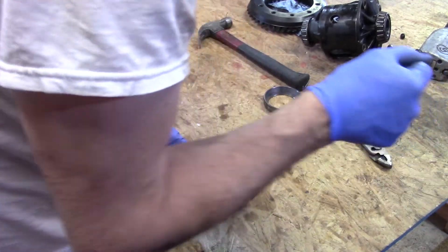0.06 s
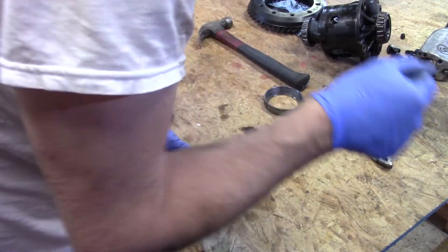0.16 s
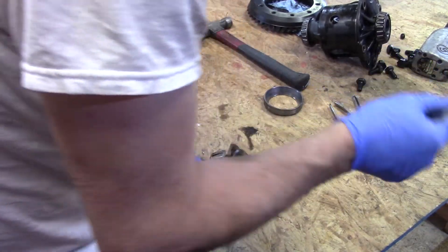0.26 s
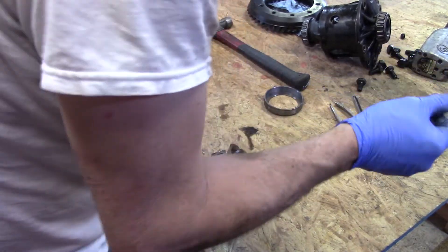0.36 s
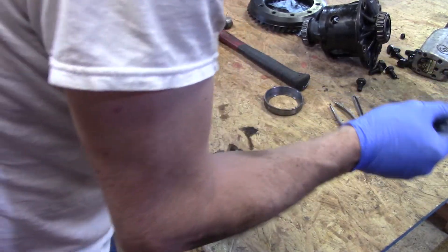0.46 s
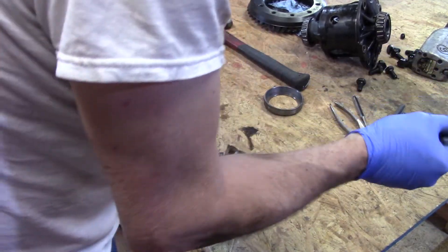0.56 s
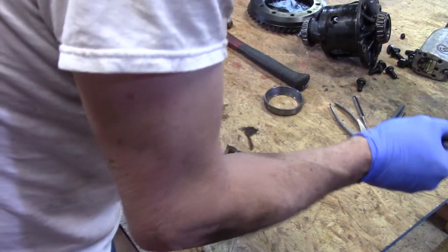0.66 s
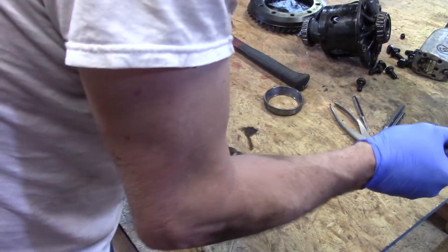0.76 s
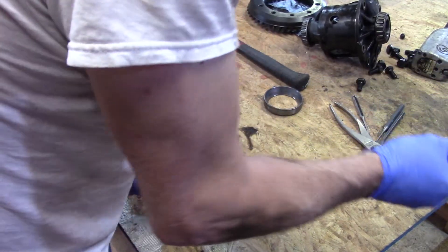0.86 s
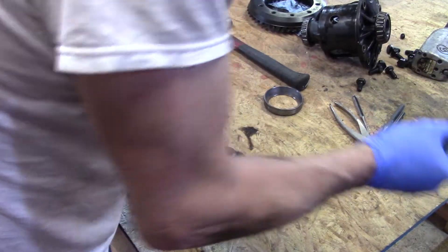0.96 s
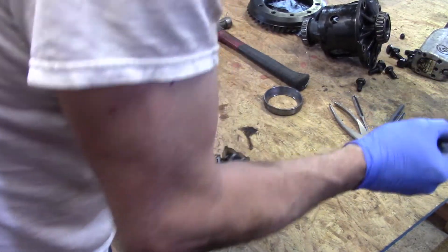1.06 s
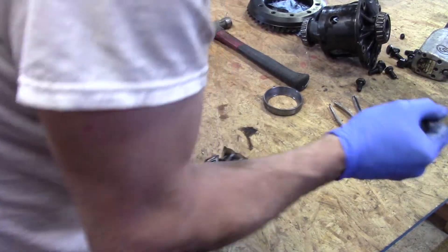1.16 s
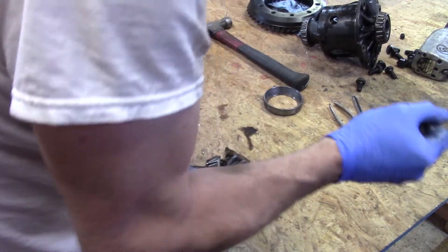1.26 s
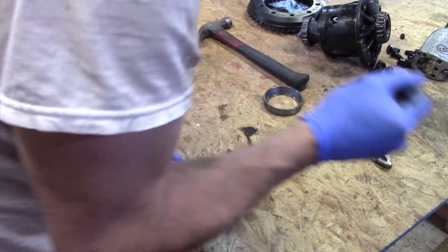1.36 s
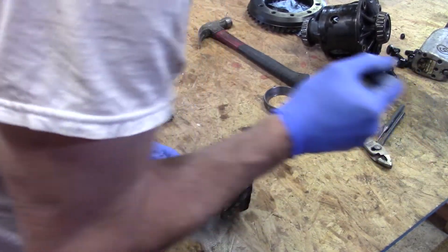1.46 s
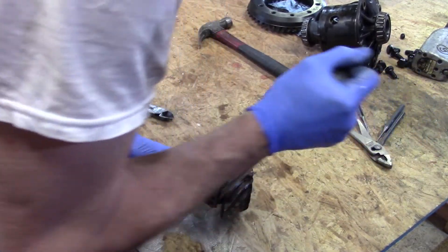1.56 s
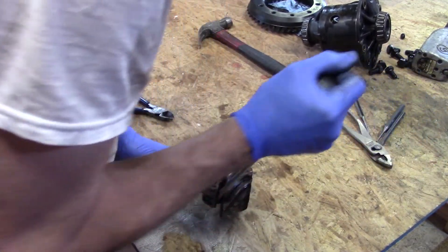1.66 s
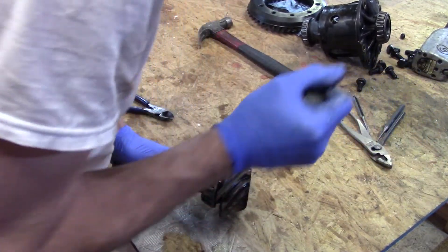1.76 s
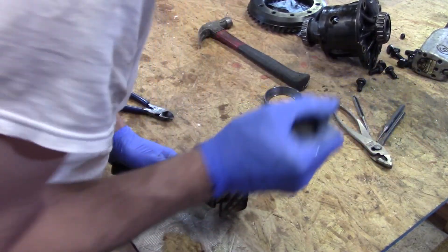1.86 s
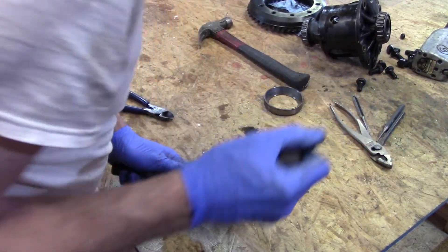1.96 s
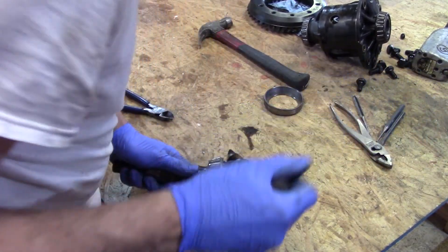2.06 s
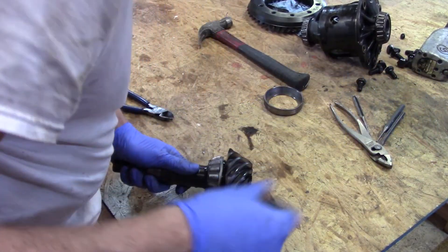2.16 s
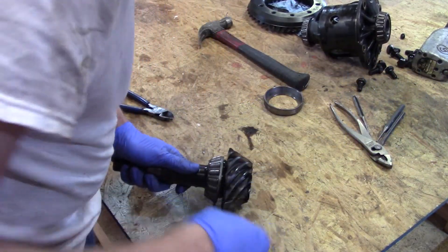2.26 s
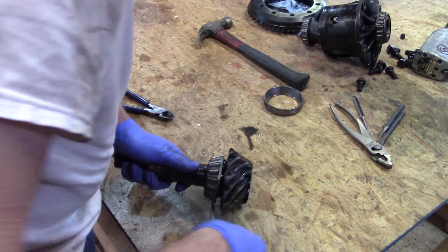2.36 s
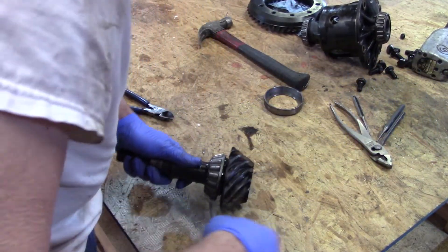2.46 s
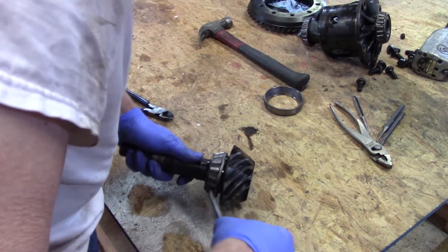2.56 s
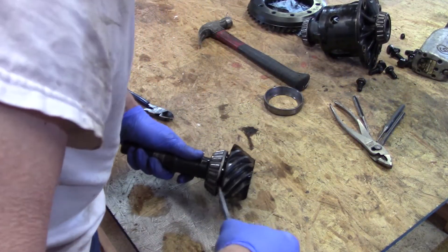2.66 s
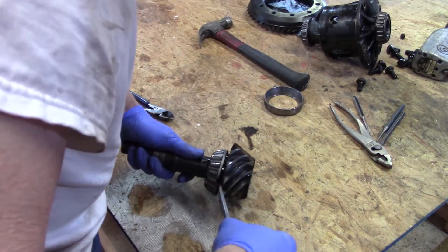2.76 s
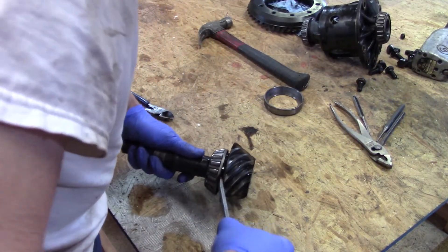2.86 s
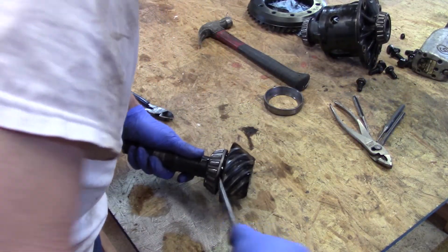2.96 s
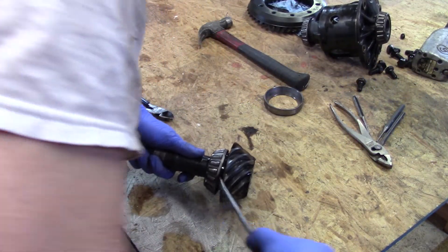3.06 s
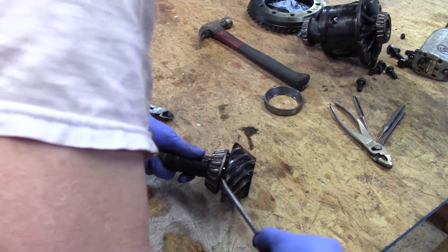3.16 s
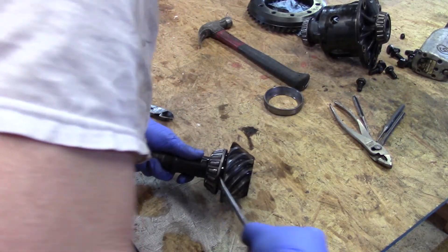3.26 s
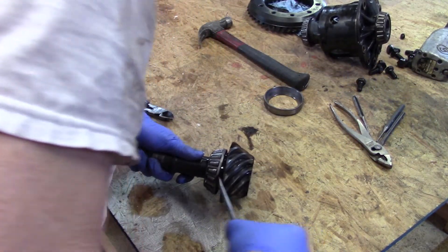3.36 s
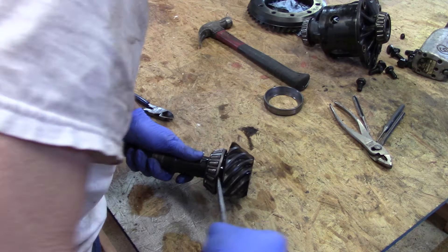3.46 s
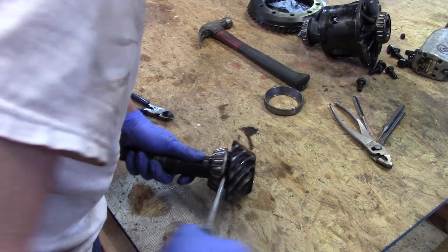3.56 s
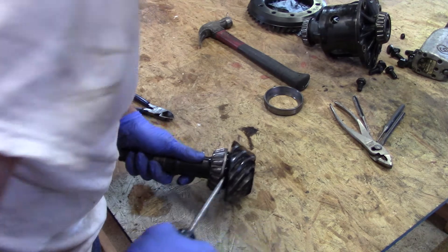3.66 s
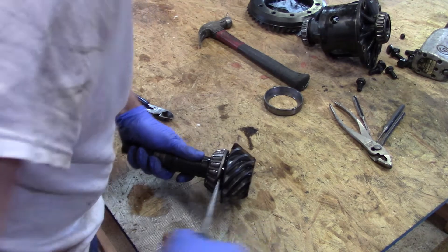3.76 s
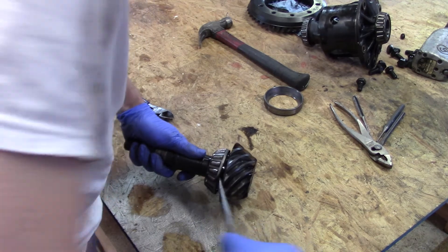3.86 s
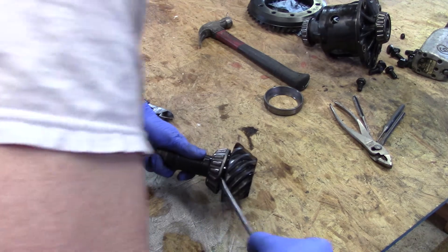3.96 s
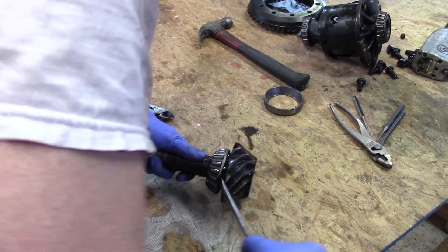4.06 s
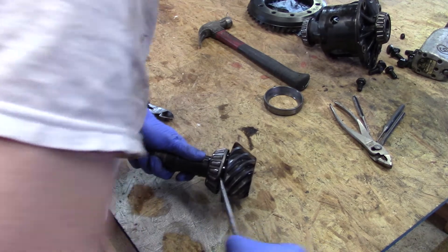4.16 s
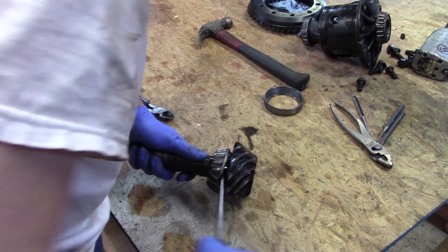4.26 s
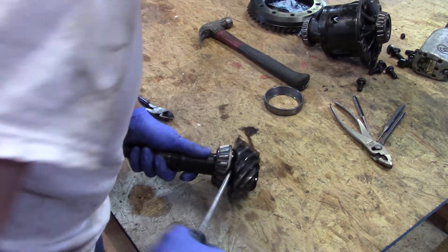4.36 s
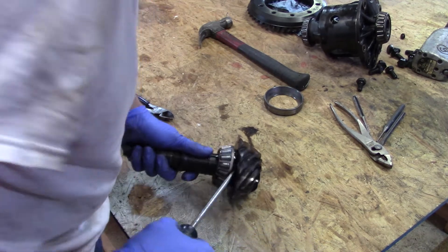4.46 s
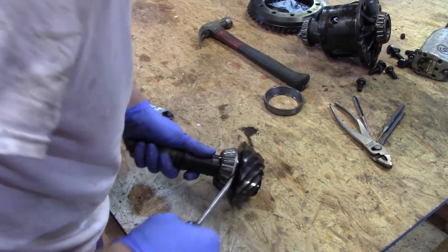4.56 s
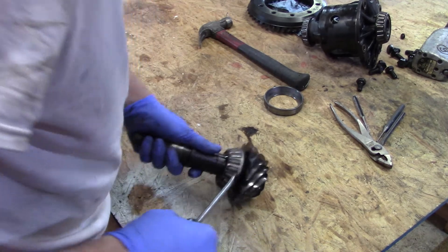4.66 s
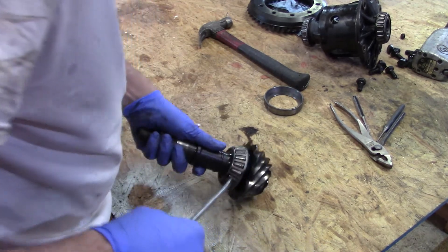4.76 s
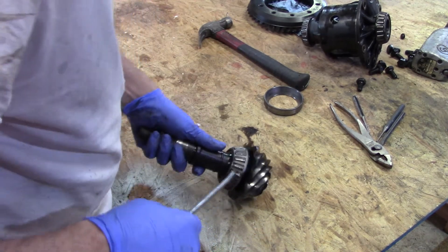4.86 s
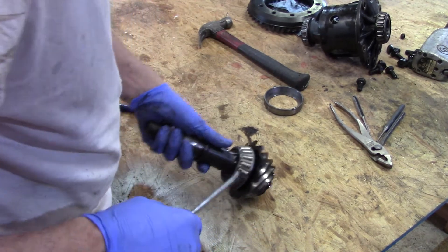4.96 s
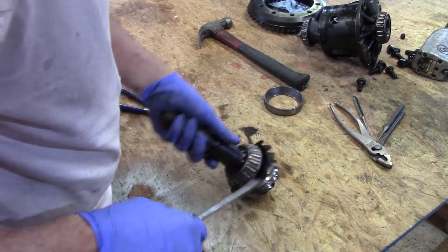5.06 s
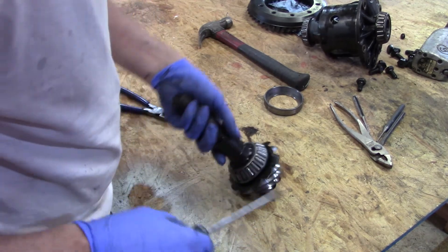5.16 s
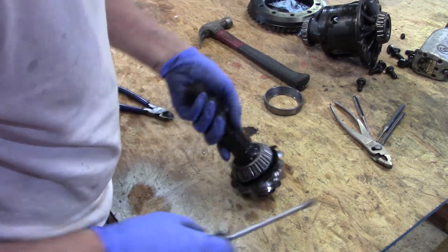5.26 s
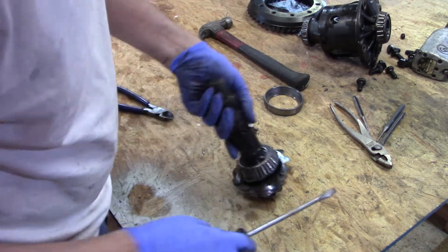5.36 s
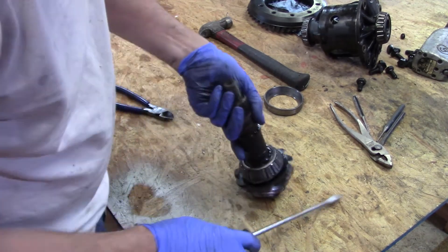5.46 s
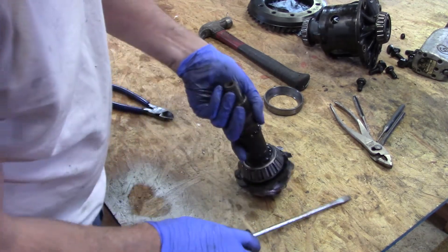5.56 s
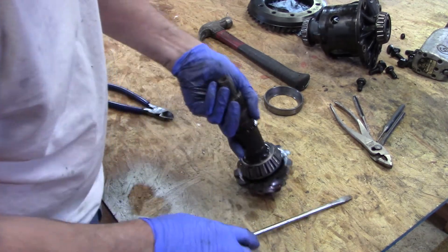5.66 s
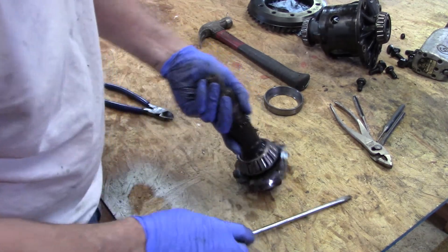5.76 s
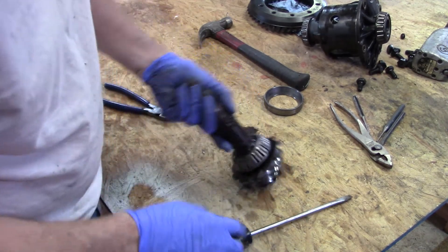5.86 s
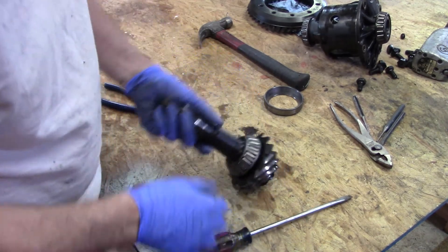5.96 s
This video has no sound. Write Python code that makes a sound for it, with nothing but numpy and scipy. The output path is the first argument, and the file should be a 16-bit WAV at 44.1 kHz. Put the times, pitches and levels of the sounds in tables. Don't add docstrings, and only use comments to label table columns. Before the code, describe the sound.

A quiet garage with low, soft room air and a short diffuse echo, heard closely in stereo. At 0.25-0.35 s a few light clinks end in one sharp tick, then near silence for a second. From 1.36 to 1.65 s loose steel parts clatter and jingle brightly in a tray over bench knocks; grainy dragging, a low hum and small tool ticks continue to about 2.2 s. At 2.26 s a heavy gear thuds dully on wood, with glove rustle. Prying clacks come at 2.55-2.7 s, then a clear ringing strike at 2.73 s. Faint picking ticks and soft wooden taps are scattered from 2.9 to 4.7 s, with a stronger clack at 3.8 s. A crisp, loud snap bursts at 4.94 s. After a faint rustle, strong hollow bench knocks with metallic rattle cluster at 5.5-5.75 s, ending in small taps and brief low scrapes.

```python
import sys
import numpy as np
from scipy import signal
from scipy.fft import rfft, irfft, next_fast_len
from scipy.io import wavfile
from scipy.ndimage import uniform_filter1d, map_coordinates

SR = 44100
rng = np.random.default_rng(int(sys.argv[2]) if len(sys.argv) > 2 else 0)


def bounce(signal):
    frames = np.transpose(np.atleast_2d(signal))
    limited = np.clip(frames, -1, 1)
    pcm = np.round(limited * 32767).astype(np.int16)
    wavfile.write(sys.argv[1], SR, pcm)


def natural_amplitude(level_db):
    exponent = np.asarray(level_db, float) / 20
    return 10 ** exponent


N = 264776
TOP_HZ = 15900
SLIDE_SWELL_DB = 22

# (frequency [Hz], level [dB], t60 [s])
TRAY_MODES = [(2400, 0, .05), (2950, 0, .07), (4200, -3, .06), (7700, -3, .05)]


def unit(x):
    return x / np.sqrt(np.mean(x ** 2) + 1e-20)


def along(points, hz):
    f, v = np.transpose(points)
    return np.interp(np.log(hz + 1), np.log(f + 1), v)


def filtered(x, response):
    m = next_fast_len(x.shape[-1] + SR // 2)
    spectrum = rfft(x, m) * response(np.fft.rfftfreq(m, 1 / SR))
    return irfft(spectrum, m)[..., :x.shape[-1]]


def resonances(peaks):
    def response(f):
        total = 0
        for k, (center, width, db) in enumerate(peaks):
            damping = 1j * f * width
            total = total + (-1) ** k * natural_amplitude(db) * damping / (center * center - f * f + damping)
        return total
    return response


def low_cut(hz):
    corner_hz = 91.5
    return (1j * hz / (corner_hz + 1j * hz)) ** 3


def wobble(rate):
    knots = rng.standard_normal(int(N * rate / SR) + 4)
    return map_coordinates(knots, [np.arange(N) * rate / SR])


def grit(depth_db, rate):
    return natural_amplitude(depth_db * wobble(rate)) * rng.standard_normal(N)


def add(track, s, sound):
    part = track[int(round(s * SR)):][:len(sound)]
    part += sound[:len(part)]


def ring(hz, db, t60, t, rough=0):
    hz, db, t60 = (np.asarray(v)[:, None] for v in (hz, db, t60))
    steps = uniform_filter1d(rng.standard_normal((len(hz), len(t))), size=120, axis=1)
    drift = rough * np.cumsum(uniform_filter1d(steps, size=90, axis=1), 1)
    decay = natural_amplitude(db - 60 * t / np.maximum(t60, .002))
    return np.sum(decay * np.sin(2 * np.pi * hz * t + drift), 0)


def strokes(rows, swell_db):
    t, gains = np.arange(N) / SR, 0
    for start, top, end, *levels in rows:
        fade = np.clip(np.minimum(t - start, end - t) / .03, 0, 1)
        swell = natural_amplitude(np.interp(t, [start, top, end], [-swell_db, 0, -swell_db]))
        gains = gains + fade * swell * natural_amplitude(levels)[:, None]
    return gains


def steel(contacts, modes, top_db, ring_db):
    # (frequency [Hz], density [dB per Hz])
    burst_colour = [(600, -15), (1000, -13.5), (2980, 0), (4180, -5), (4930, -9), (6310, 1), (8760, 0.5),
                    (10300, -12), (11800, -22), (13600, -15.5), (15700, -31.5), (16600, -39.5)]
    usual_life_s = .02
    out = np.zeros(N)
    short = np.arange(2048) / SR
    long = np.arange(int(SR * max(mode[2] for mode in modes))) / SR
    hz = np.fft.rfftfreq(len(short), 1 / SR)
    mode_hz, mode_db, mode_t60 = np.transpose(modes)
    noise = rng.standard_normal((len(contacts), len(short)))
    chance = rng.standard_normal((len(contacts), 2, len(modes)))
    for (s, db, clank_db, life), hiss, (a, b) in zip(contacts, noise, chance):
        doublings = np.log2(max(life, .003) / usual_life_s)
        sparkle_db = top_db - 0.24 * clank_db + 3 * doublings
        sing_db = ring_db - doublings
        tilt = [(1000, clank_db + 8.0), (2900, clank_db + 3.5), (5600, 0.013), (8800, 0.011),
                (12000, sparkle_db + 17.0)]
        colour = natural_amplitude(along(burst_colour, hz) + along(tilt, hz))
        bright = np.sum(colour[(hz > 4500) & (hz < 10000)] ** 2) * 2 / len(short)
        hiss = irfft(rfft(hiss) * colour, len(short)) / np.sqrt(bright)
        crack = natural_amplitude(3 - 60 * short / .007)
        chatter = natural_amplitude(-60 * short / max(life, .003))
        onset = 1 - np.exp(-short / (0.022 * life))
        add(out, s - .0006, natural_amplitude(db - 11.5) * onset * (crack + chatter) * hiss)
        sing = ring(mode_hz * (1 + .005 * a), mode_db + 1.5 * b, mode_t60, long, rough=.085)
        sing = sing * (1 + 2.13 * natural_amplitude(-60 * long / 0.021))
        add(out, s, natural_amplitude(.92 * db - 2.5 + max(clank_db, 0) + sing_db) * sing)
    return out


def air():
    # (frequency [Hz], density [dB per Hz])
    floor = [(15, -57.5), (25, -31.5), (135, 0), (252, 0.5), (389, -6.5), (483, -5.5), (687, -10.5),
             (1030, -14), (1150, -17.5), (1390, -17.5), (2820, -25), (5570, -29.5), (11300, -37.5),
             (15200, -42.5), (16500, -43.5)]
    # (frequency [Hz], likeness [0-1])
    likeness = [(60, 0.96), (240, 0.97), (950, 0.85), (3770, 0.81), (15000, 0.97)]
    # (frequency [Hz], width [Hz], level [dB])
    lamp = (11100, 50, -81)

    def mid_side(hz):
        turn = np.arccos(np.clip(along(likeness, hz), -1, 1)) / 2
        return natural_amplitude(along(floor, hz)) * np.array([np.cos(turn), np.sin(turn)])

    mid, side = filtered(rng.standard_normal((2, N)), mid_side)
    lamp_hz, lamp_width_hz, lamp_db = lamp
    whine = unit(filtered(rng.standard_normal(N), resonances([(lamp_hz, lamp_width_hz, 0)])))
    hiss = filtered(np.array([mid + side, mid - side]), lambda hz: hz < TOP_HZ)
    sway_db = .6 * wobble(9)
    return natural_amplitude(-48.5 + sway_db) * unit(hiss) + natural_amplitude(lamp_db) * whine


def tray_parts():
    # (time [s], peak [dB], low clank [dB], chatter life [s])
    clinks = [(.2442, -30, 2.5, .029), (.2536, -26, -2, .05), (.2696, -31, 2, 0.098),
              (.3024, -18, -10, 0.043), (.3274, -21, -3, .041), (.3356, -0.5, -11.5, 0.05),
              (1.3622, -25.5, -32.5, 0.011), (1.3742, -19, -12.5, .025), (1.4015, 0, -1, .02),
              (1.4205, -9.5, -12.5, 0.014), (1.431, -14.5, -25, .012), (1.4535, 1, -7.5, .008),
              (1.4572, 2, -3.5, 0.023), (1.471, -21, -18.5, .025), (1.4795, -9, -15.5, 0.063),
              (1.49, -16.5, -12, .039), (1.5118, -6.5, -6.5, 0.025), (1.5146, 0.5, -7.5, 0.046),
              (1.5195, -13.5, 4.5, 0.012), (1.522, -12.5, -21.5, 0.034), (1.6242, -26, -3.5, 0.012)]
    return steel(clinks, TRAY_MODES, top_db=-14.0, ring_db=-44.0)


def knocks():
    # (frequency [Hz], level [dB])
    low_modes = [(172, -7), (220, -3.5), (250, -10), (300, -1.5), (380, 3), (420, -6), (510, -3.5),
                 (578, 4), (630, -3.5), (690, -3), (770, -0.5), (880, -9.5)]
    # (frequency [Hz], level [dB])
    high_modes = [(1040, 4.5), (1180, 9), (1300, -8), (1520, 2), (1680, -1.5), (1860, -15), (2250, -4)]
    # (time [s], peak [dB], hardness [dB], life [s], pitch favoured by the spot [Hz])
    blows = [(1.4, -11, -8, 0.067, 415), (1.454, -16, -16, .09, 520), (1.512, -3, -4.5, 0.029, 480),
             (2.264, 4, -20, 0.07, 575), (2.266, 0, -30, .08, 375), (2.29, -1, -29, 0.038, 385),
             (2.27, -8, -30, .12, 235), (2.315, -21.5, -3, 0.12, 600), (2.332, -10, -33, 0.047, 583),
             (2.405, -27, -25, 0.057, 570), (2.44, -26, -24.5, 0.04, 370), (5.512, 2.5, -13, 0.057, 566),
             (5.513, 4.5, -25, 0.077, 294), (5.533, -6, -26, 0.04, 620), (5.592, -1.5, -0.5, 0.12, 740),
             (5.593, -3, -16, 0.039, 290), (5.615, -2.5, -9, 0.054, 616), (5.642, -6.5, -5, 0.057, 597),
             (5.66, 5.5, -10.5, 0.066, 378), (5.69, 0, -10, 0.06, 385), (5.713, -14, -4, 0.072, 564),
             (5.769, -17, -2, .04, 300)]
    # (time [s], peak [dB], hardness [dB], pitch favoured by the spot [Hz])
    taps = [(0.246, -21, -16, 435), (.259, -21, -16, 426), (0.293, -25, 1, 402), (.339, -17, -6, 300),
            (1.86, -37, -18, 450), (1.935, -20.5, -22, 400), (1.956, -31, -29, 402),
            (2.488, -23.5, -22, 577), (2.901, -22.5, -7, 403), (3.283, -16, -9.5, 417),
            (3.533, -26.5, -16, 450), (3.755, -25, -18, 555), (3.802, -23.5, 2.5, 350),
            (3.948, -28, -11, 800), (3.963, -28.5, -20, 380), (4.129, -28.5, -1, 398.3),
            (4.311, -21, -19, 422), (4.45, -26, 5, 350), (4.786, -25.5, -21, 258), (4.799, -27, -29, 483),
            (4.942, -23.5, -16, 300), (5.845, -17, -22, 379.3), (5.899, -16.5, -22, 260),
            (5.981, -21.5, -29, 380)]
    tap_life_s, spot_db_per_octave = 0.069, 19.5
    out, t = np.zeros(N), np.arange(SR // 7) / SR
    low_hz, low_db = np.transpose(low_modes)
    high_hz, high_db = np.transpose(high_modes)
    rows = blows + [(s, db, hard_db, tap_life_s, hz) for s, db, hard_db, hz in taps]
    chance = rng.standard_normal((len(rows), 3, len(low_modes)))
    push = 1 - np.exp(-t / 0.00064)
    for (s, db, hard_db, life, spot_hz), (a, b, c) in zip(rows, chance):
        spot_db = 2.5 * b - spot_db_per_octave * np.abs(np.log2(low_hz / spot_hz))
        bent_hz = low_hz * (1 + .012 * a)
        thud = ring(bent_hz, low_db + spot_db, life * (400 / low_hz) ** 0.036, t, rough=0.092)
        high_t60 = np.full(len(high_hz), .5 * life)
        tap = ring(high_hz, high_db + 3 * c[:len(high_hz)], high_t60, t, rough=0.26)
        thud = thud / np.max(np.abs(thud))
        tap = tap / np.max(np.abs(tap))
        add(out, s - .001, natural_amplitude(db) * push * (thud + natural_amplitude(hard_db) * tap))
    return out


def garage(x):
    # (frequency [Hz], t60 [s])
    decay = [(150, 0.52), (600, 0.29), (2500, 0.38), (7000, 0.34), (15000, 0.34)]
    # (frequency [Hz], level [dB])
    tone = [(150, 8), (1000, 5.5), (5000, 6.5), (10000, -4), (15000, 1.5)]
    # (frequency [Hz], level [dB])
    side_level = [(150, -72), (500, -29), (1500, -24.5), (5000, -13), (14000, -10)]
    delay = 250
    out, step = np.zeros((2, N + SR)), SR // 3
    for start in range(0, N, step):
        hz, t, z = signal.stft(rng.standard_normal((2, SR * 2 // 3)), SR, nperseg=256)
        gain = natural_amplitude(along(tone, hz)[:, None] - 60 * t / along(decay, hz)[:, None])
        gain = gain * np.array([np.ones_like(hz), natural_amplitude(along(side_level, hz))])[..., None]
        mid, side = signal.istft(z * gain, SR, nperseg=256)[1]
        tail = np.array([mid + side, mid - side]) / np.linalg.norm(mid)
        wet = signal.fftconvolve(x[None, start:start + step], tail, axes=1)
        out[:, start + delay:][:, :wet.shape[1]] += wet[:, :N + SR - start - delay]
    return out[:, :N]


def pings():
    # (time [s], level [dB], frequency [Hz], t60 [s])
    single_modes = [(.336, -19, 7000, 0.019), (1.402, -15, 2390, .025), (1.403, -16, 2960, .03),
                    (1.453, -11.5, 4240, 0.024), (1.455, -19, 1740, .025), (1.515, -14, 2400, 0.038),
                    (1.516, -7, 7900, .025), (2.228, -17.5, 8100, .02), (2.564, -15, 5600, .025),
                    (2.577, -15, 6700, .03), (2.619, -16.5, 2810, .025), (2.69, -25, 5800, .025),
                    (2.729, -8, 7240, .025), (2.926, -29, 7200, 0.035), (3.05, -29.5, 7200, 0.018),
                    (3.805, -8.5, 2270, .015), (3.806, -21, 6100, .02), (3.963, -31, 1690, 0.027),
                    (3.964, -30, 3780, .025), (4.45, -23, 1990, 0.025), (4.605, -23, 2400, .02),
                    (4.665, -32.5, 7050, 0.027), (4.94, -13.5, 3016, 0.027), (4.941, -14, 6600, .025),
                    (5.593, -12.5, 1880, .03), (5.642, -18, 2100, .02), (5.672, -21, 2080, .02),
                    (5.527, -27, 7540, .03)]
    out, t = np.zeros(N), np.arange(2048) / SR
    onset = 1 - np.exp(-t / .0006)
    for s, db, hz, t60 in single_modes:
        add(out, s, onset * ring([hz], [db], [t60], t, rough=.2))
    return out


def rattle():
    # (start [s], hardest [s], end [s])
    spans = [(1.4, 1.44, 1.52), (1.47, 1.53, 1.68), (2.545, 2.6, 2.76), (3.8, 3.83, 3.95),
             (4.6, 4.64, 4.74), (4.79, 4.82, 4.93), (5.51, 5.54, 5.62), (5.59, 5.63, 5.82)]
    # (clank [dB], jingle [dB])
    levels = [(-42, -35), (-44, -37), (-37, -40), (-52, -57), (-50, -49.5), (-44, -62), (-40, -52),
              (-38, -54)]
    # (frequency [Hz], density [dB per Hz])
    clank_colour = [(600, -26.5), (1500, -1), (2200, 4), (3300, -2.5), (4500, -6), (5500, -32.5)]
    # (frequency [Hz], density [dB per Hz])
    jingle_colour = [(2500, -20), (3800, -4), (6000, 0), (8500, -3), (10500, -18), (13000, -26),
                     (16000, -40)]
    grains = natural_amplitude(4 * wobble(rate=300)) * rng.standard_normal((2, N))
    low, high = filtered(grains, lambda hz: natural_amplitude([along(clank_colour, hz), along(jingle_colour, hz)]))
    rows = [(*span, *level) for span, level in zip(spans, levels)]
    clank, jingle = strokes(rows, swell_db=13)
    return clank * unit(low) + jingle * unit(high)


def slides():
    # (start [s], hardest [s], end [s], bench rumble [dB], steel scrape [dB])
    drags = [(1.4, 1.45, 1.915, -26.5, -43), (1.48, 1.63, 1.71, -27.5, -59), (1.78, 1.95, 2.1, -30, -55),
             (1.83, 2.01, 2.116, -48, -39.5), (2.14, 2.24, 2.31, -35.5, -39.5),
             (4.77, 4.81, 4.894, -34, -43), (5.82, 5.85, 5.9, -27, -78), (5.95, 5.99, 5.85, -26, -65)]
    # (frequency [Hz], width [Hz], level [dB])
    bench_peaks = [(190, 270, -8), (275.4, 66, 6.5), (428.4, 55, 8), (518, 120, 5), (594, 330, -5),
                   (870, 120, -5.5)]
    # (frequency [Hz], width [Hz], level [dB])
    edge_peaks = [(1150, 700, -5), (1750, 250, -1), (2800, 300, 0), (3450, 500, -5), (4050, 400, -4),
                  (6500, 3000, -12)]
    rumble = unit(filtered(grit(2.5, rate=50), resonances(bench_peaks)))
    scrape = unit(filtered(grit(2.5, rate=120), resonances(edge_peaks)))
    weight, edge = strokes(drags, SLIDE_SWELL_DB)
    return weight * rumble + edge * scrape


def rolling():
    # (start [s], hardest [s], end [s], level [dB], frequency [Hz])
    rolls = [
        (1.529, 1.616, 1.705, -27, 504),
        (1.891, 1.95, 2.08, -30, 403),
    ]
    out = np.zeros(N)
    for *row, hz in rolls:
        hum = unit(filtered(rng.standard_normal(N), resonances([(hz, 26, 0)])))
        out += strokes([row], SLIDE_SWELL_DB)[0] * hum
    return out


def drawn_tool():
    # (time [s], peak [dB], low clank [dB], chatter life [s])
    ticks = [(1.7936, -26, -6, 0.013), (1.8484, -40, 4, .025), (1.8865, -45, 10, .025),
             (1.9014, -44, 18.5, 0.041), (1.9445, -36, 11, .03), (1.9726, -29, 4.5, 0.047),
             (2.0394, -30, -7, .015), (2.009, -21.5, -6, 0.04), (2.0202, -30.5, 7, .023),
             (2.1982, -36, 5, 0.12), (2.2174, -24, -16, 0.022), (2.2284, -13.5, -11.5, 0.013),
             (2.2884, -32.5, 10.5, 0.11)]
    return steel(ticks, TRAY_MODES, top_db=-14.5, ring_db=-43)


def gloves():
    # (start [s], hardest [s], end [s], level [dB])
    rubs = [(1.82, 2.02, 2.24, -50), (2.0, 2.26, 2.61, -47), (2.54, 2.57, 2.64, -46),
            (4.92, 5.4, 5.62, -51.5), (5.85, 5.95, 6.08, -52)]
    # (frequency [Hz], density [dB per Hz])
    rustle_colour = [(880, -28), (1500, -4), (2680, 3), (4430, -4), (7320, 3), (12800, -7), (15900, -11.5),
                     (16500, -15)]
    rustle = unit(filtered(grit(2.4, rate=49), lambda hz: natural_amplitude(along(rustle_colour, hz))))
    return strokes(rubs, swell_db=15)[0] * rustle


def pried_gear():
    # (time [s], peak [dB], low clank [dB], chatter life [s])
    pries = [(2.5464, -4.5, -1.5, 0.036), (2.5636, -5.5, -7, .015), (2.5741, -4.5, -10.5, 0.035),
             (2.5956, -24.5, 4.5, 0.011), (2.6201, -14.5, 4.5, 0.036), (2.6343, -24, -3, 0.0059),
             (2.6852, -16, -2.5, 0.0074), (2.69, -17, -1, 0.046)]
    # (frequency [Hz], level [dB], t60 [s])
    gripped_modes = [(1927, -2.5, 0.11), (2910, 3, .08), (3300, -6, .05), (5830, 7, .04), (7300, -18, .05)]
    return steel(pries, gripped_modes, top_db=-15.5, ring_db=-26.5)


def free_gear():
    # (frequency [Hz], level [dB], t60 [s])
    gear_modes = [(1927, 0, .24), (2870, -4, .26), (4200, -13, .2), (5470, -2, .22), (6200, -14, .12),
                  (6880, -8, .18), (7300, -5, .14)]
    # (time [s], peak [dB], low clank [dB], chatter life [s])
    strikes = [
        (2.7288, -6, 0, 0.0079),
        (2.7458, -27, 10.5, 0.033),
    ]
    # (time [s], peak [dB], low clank [dB], chatter life [s])
    picks = [(2.9235, -25, 0, 0.025), (3.028, -40, 4, .012), (3.0495, -22, -13, 0.008),
             (3.063, -33, -17, 0.013), (3.0757, -41, -21, 0.013), (3.0923, -34.5, -2, 0.014),
             (3.269, -37, -6, .015), (3.2824, -29, 2.5, 0.056), (3.2998, -28, -9, 0.012),
             (3.4622, -43, -4.5, .019), (3.5314, -42.5, 2, .015), (3.5488, -35.5, -4, 0.021),
             (3.7233, -25, -32, 0.019), (4.267, -47.5, 0, .015)]
    struck = steel(strikes, gear_modes, top_db=-34, ring_db=-19)
    return struck + steel(picks, gear_modes, top_db=-16.5, ring_db=-34.5)


def levered_race():
    # (time [s], peak [dB], low clank [dB], chatter life [s])
    levers = [
        (3.8056, -15.5, 4.5, 0.019),
        (3.82, -41, -10, .02),
        (3.8644, -44, 10, 0.013),
    ]
    # (frequency [Hz], level [dB], t60 [s])
    race_modes = [(1450, -2, .07), (2250, 0, .14), (3460, -7, .07), (3840, -7, .1), (4770, -4, .14),
                  (6130, -4, .1)]
    return steel(levers, race_modes, top_db=-19, ring_db=-26)


def nudged_cage():
    # (time [s], peak [dB], low clank [dB], chatter life [s])
    nudges = [(3.9478, -51, 2, .017), (3.963, -28.5, 6.5, 0.0086), (3.969, -42, -10, 0.011),
              (4.123, -33.5, -9, 0.017), (4.1302, -33.5, -21, 0.04), (4.2884, -31.5, 1.5, 0.025),
              (4.3116, -44, 10.5, 0.018), (4.344, -36, -17, 0.024), (4.363, -26.5, -2.5, 0.019),
              (4.4461, -33, 14, 0.011), (4.4504, -27.5, 10, 0.0047), (4.6002, -36, 12, 0.028),
              (4.6047, -21.5, 6, 0.014), (4.611, -27.5, 1, .02)]
    # (frequency [Hz], level [dB], t60 [s])
    cage_modes = [(1350, -1, .07), (1700, -8, .04), (2050, 0, .13), (3800, -4, .11)]
    return steel(nudges, cage_modes, top_db=-22, ring_db=-27.5)


def slipping_tip():
    # (time [s], peak [dB], low clank [dB], chatter life [s])
    slips = [
        (4.655, -37, -6, .02),
        (4.6637, -37, 5, 0.013),
        (4.6673, -30.5, -6.5, 0.0055),
    ]
    # (frequency [Hz], level [dB], t60 [s])
    tip_modes = [(1900, 0, .08), (4200, -9, .16), (7100, -3, .08), (10200, -13, .07)]
    return steel(slips, tip_modes, top_db=-39.5, ring_db=-16.5)


def released_rollers():
    # (time [s], peak [dB], low clank [dB], chatter life [s])
    snaps = [(4.789, -48, 6, 0.032), (4.8, -35, 15.5, 0.045), (4.9377, 0, -5.5, 0.015),
             (4.9466, -2.5, -14.5, 0.015), (4.9523, -8.5, -21, 0.014), (4.9778, -33, -27, 0.019),
             (4.9883, -15.5, -15, 0.02)]
    # (frequency [Hz], level [dB], t60 [s])
    roller_modes = [(1900, -6, .1), (2930, -2, .11), (3700, -5, .1), (4300, -4, .12), (7080, -4, .12)]
    return steel(snaps, roller_modes, top_db=-18.5, ring_db=-31.5)


def tool_shank():
    # (time [s], peak [dB], low clank [dB], chatter life [s])
    shank_contacts = [(5.3598, -44, 5, 0.027), (5.5104, -13.5, 5, 0.0032), (5.5256, -22, -12, 0.018),
                      (5.5932, -19, 19.5, 0.0046), (5.6419, -32, 16, 0.02), (5.6705, -31, 12, 0.01),
                      (5.7104, -38, 10, 0.01), (5.8442, -51, 19, 0.034), (5.927, -21.5, -20, 0.033),
                      (5.94, -27, -15, 0.032)]
    # (frequency [Hz], level [dB], t60 [s])
    blade_modes = [(1860, -3, .06), (2250, 0, .05), (3200, -6, .08), (4400, -7, .12), (7600, -8, .04)]
    return steel(shank_contacts, blade_modes, top_db=-23, ring_db=-32)


def scene():
    metal = tray_parts() + rattle() + drawn_tool() + pried_gear() + free_gear()
    metal += levered_race() + nudged_cage() + slipping_tip() + released_rollers() + tool_shank()
    wood = filtered(knocks() + rolling(), low_cut)
    lean_db = 1.1 * wobble(rate=25)
    steel_pair = (metal + pings()) * natural_amplitude([lean_db, -lean_db])
    near = filtered(steel_pair + wood + slides() + gloves(), low_cut)
    far = filtered(garage(natural_amplitude(-10) * metal + natural_amplitude(-6) * wood), low_cut)
    return near * natural_amplitude([[.1], [-.1]]) + far + air()


def band_limit(x):
    return signal.sosfilt(signal.butter(12, 16970, fs=SR, output="sos"), x)


def record(dry):
    held = dry / (1 + np.abs(dry / .99) ** 8) ** (1 / 8)
    mix = filtered(held, lambda hz: natural_amplitude(np.interp(hz, [TOP_HZ, 16960, 17000], [0, -14, -70])))
    return band_limit(mix)


dry = scene()
out = record(dry)
bounce(out)
```